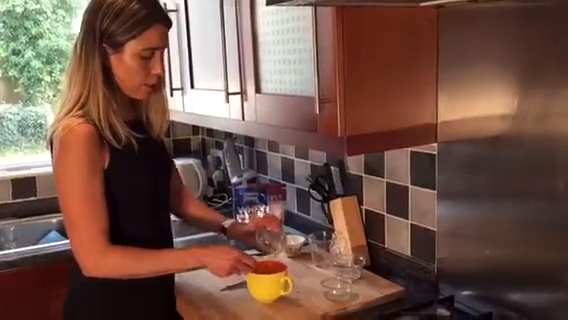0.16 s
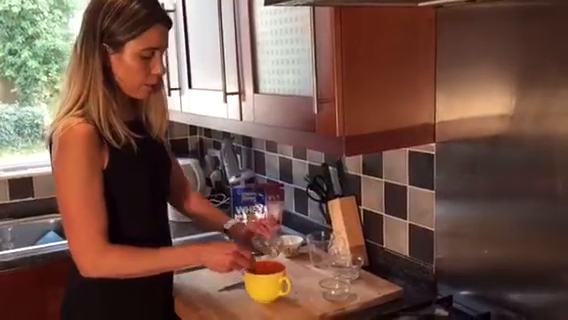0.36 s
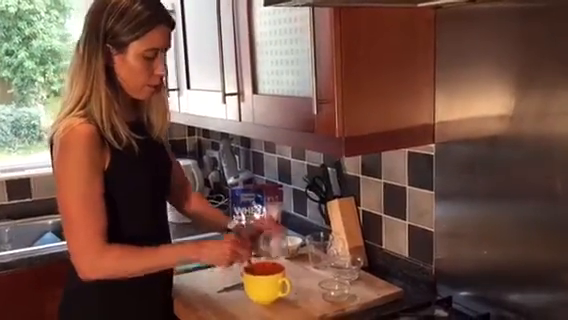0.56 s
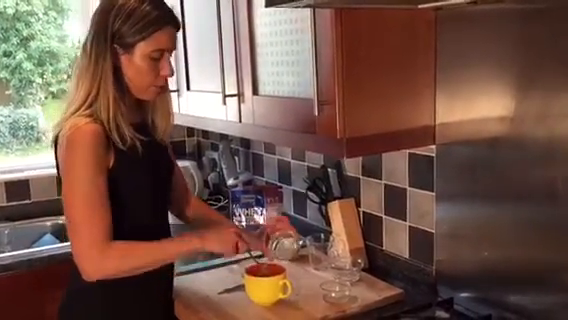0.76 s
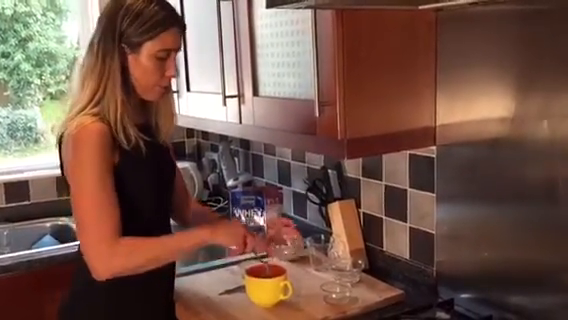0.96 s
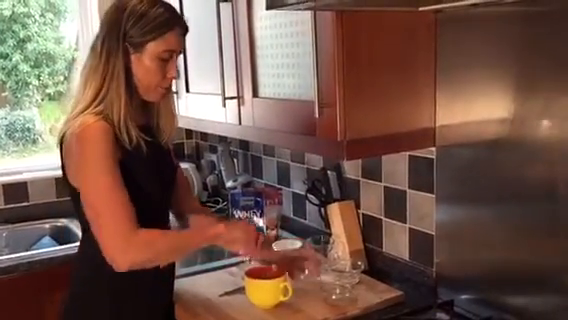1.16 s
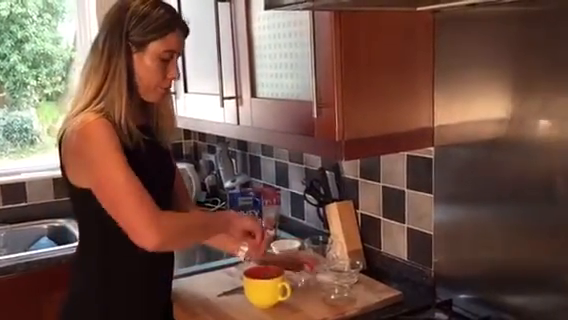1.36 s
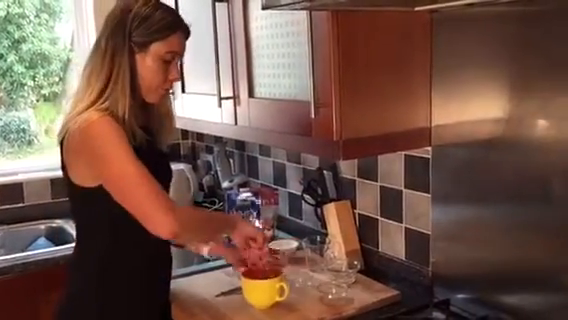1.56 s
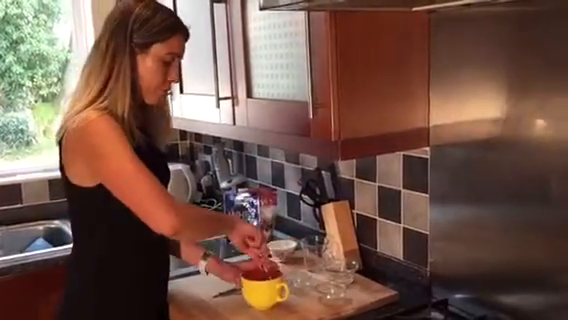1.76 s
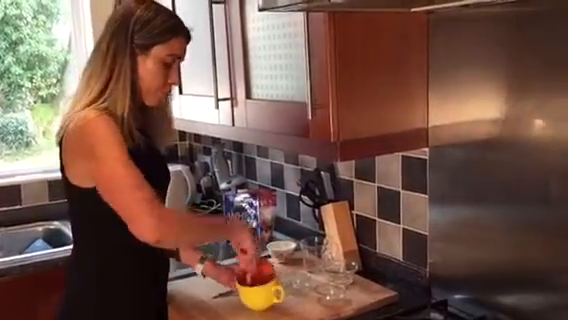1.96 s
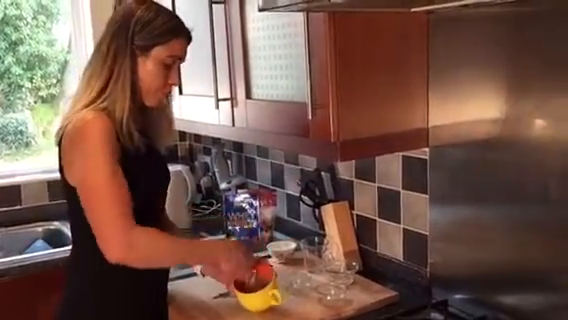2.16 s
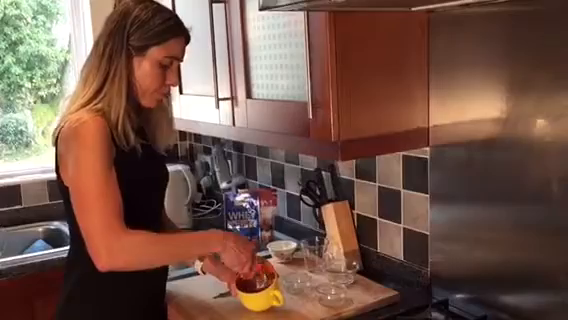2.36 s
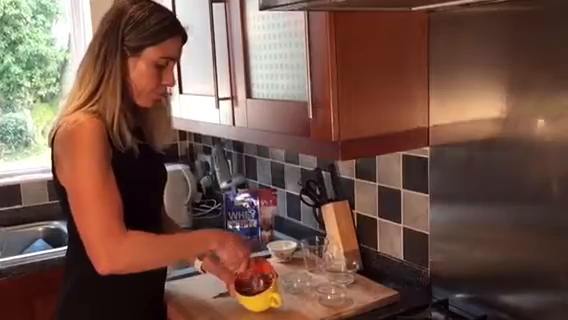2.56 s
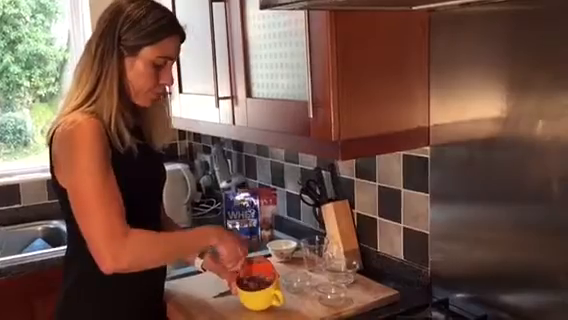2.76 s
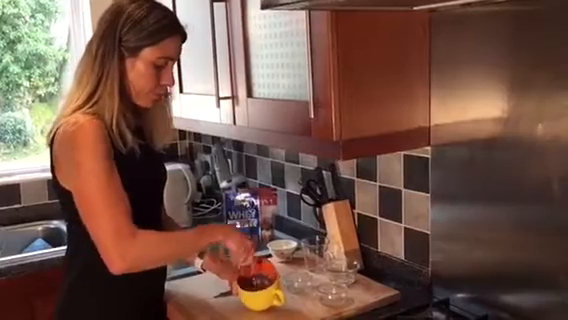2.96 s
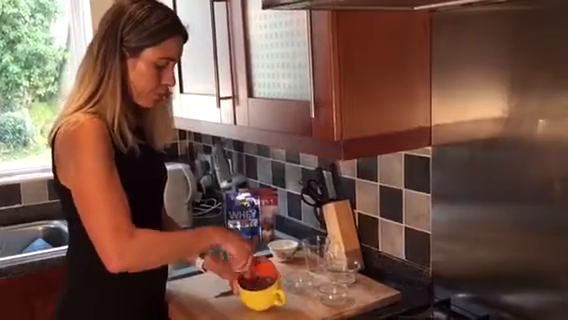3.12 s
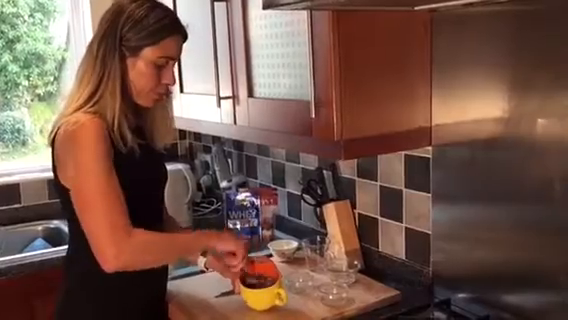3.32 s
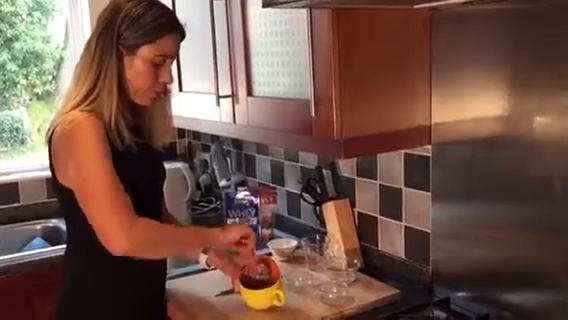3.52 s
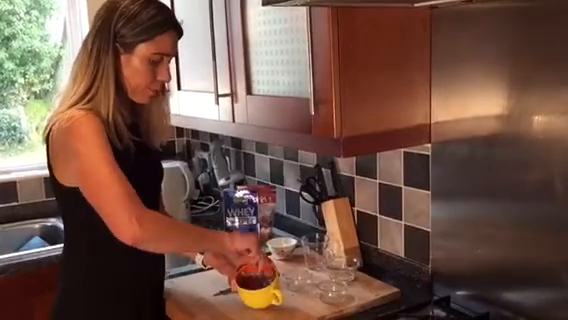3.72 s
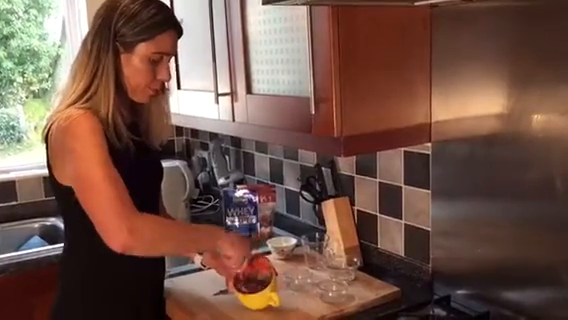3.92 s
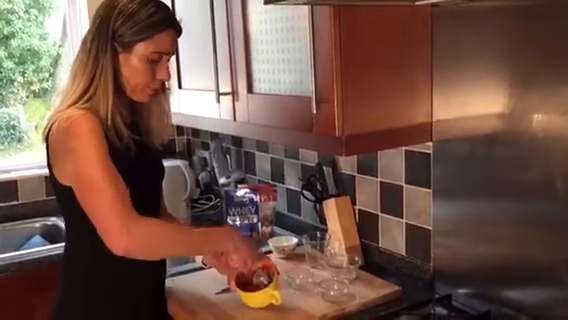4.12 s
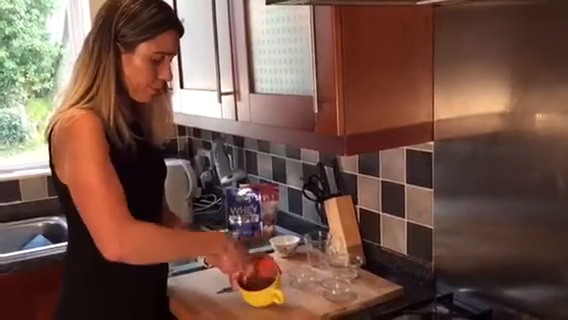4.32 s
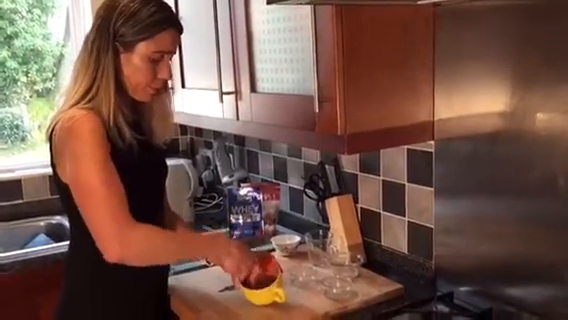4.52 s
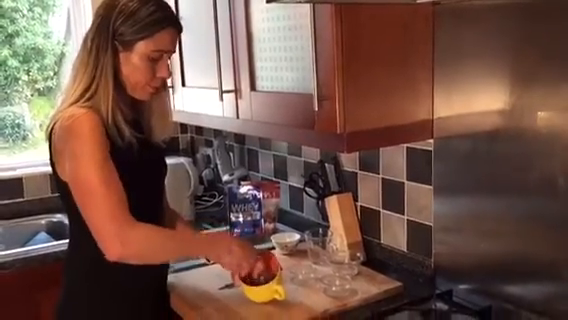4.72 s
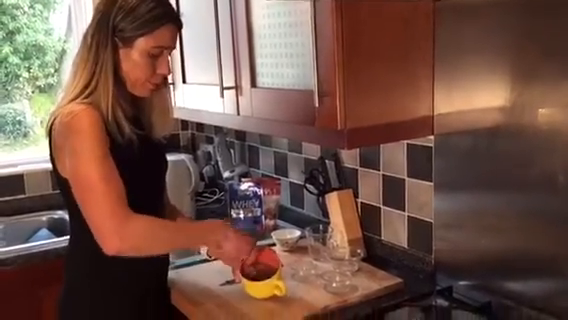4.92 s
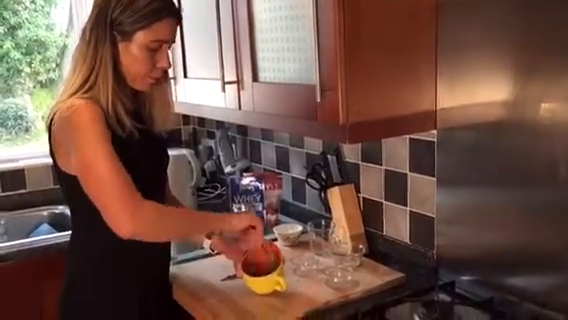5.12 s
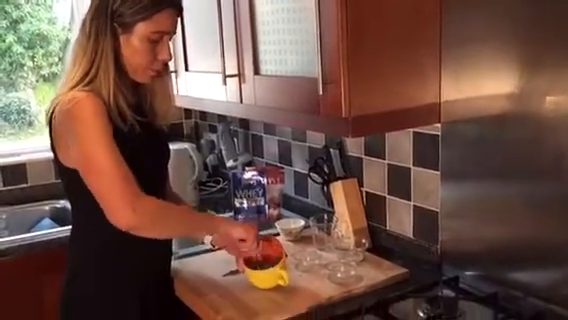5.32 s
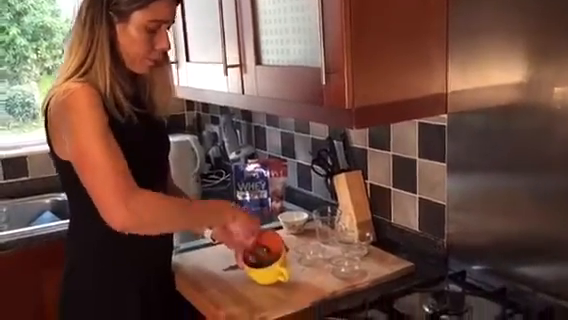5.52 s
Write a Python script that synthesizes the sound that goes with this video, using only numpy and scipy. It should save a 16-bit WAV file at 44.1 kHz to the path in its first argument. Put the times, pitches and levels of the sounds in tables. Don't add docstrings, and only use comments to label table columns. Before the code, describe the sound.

Faint touches and a fading glass ring come first, then a jar is put down firmly on a board, the loudest event. A soft mug nudge follows, then irregular spoon strokes through batter, dull slaps, ceramic clacks and light scraping, finishing with clearer ringing taps. Microphone fairly near in a small hard kitchen, with low appliance hum and short reflections.

```python
import sys
import numpy as np
from scipy import signal
from scipy.fft import irfft
from scipy.io import wavfile
from scipy.ndimage import uniform_filter1d

SR = 44100
rng = np.random.default_rng(int(sys.argv[2]) if len(sys.argv) > 2 else 0)


def convert_level_to_amplitude(level_db):
    exponent = np.asarray(level_db, float) / 20
    return 10 ** exponent


def master_out(mix):
    frames = np.transpose(np.atleast_2d(mix))
    ceiling = np.clip(frames, -1, 1)
    pcm = np.round(ceiling * 32767).astype(np.int16)
    wavfile.write(sys.argv[1], SR, pcm)


N = 250488

# start in seconds, strength in dB, sharpness of the contact in dB,
# push into the board in dB. All blow tables share these columns.
CLINKS = [
    (2.055, -60.5, 1.5, 2),
    (2.912, -34.5, -4.5, -17),
    (3.946, -44.5, -2.5, -8.5),
    (4.132, -69.5, 12.5, 2),
    (4.207, -63.5, 3, -8),
    (4.319, -57.5, -10, -1.5),
    (4.369, -30, -7.5, -16.5),
    (4.91, -66.5, 3, 0),
]
KNOCKS = [
    (0.028, -58.5, -4, -17.5),
    (3.305, -36.5, 8, -10),
    (4.588, -33, 0, -36),
    (4.825, -28.5, -3.5, -22),
]
SLAPS = [
    (1.905, -70, 27, -15),
    (1.914, -57, 12, 1.5),
    (2.129, -54, 8, -27),
    (2.552, -37.5, -5, -2),
    (2.73, -46, -12, -26.5),
    (2.775, -57.5, 6, -37),
]
GRAZES = [
    (1.657, -50.5, -1.5, -13),
    (2.491, -69, 10, -1.5),
    (2.994, -47, 4, -27),
    (3.316, -40.5, -8, -17),
    (3.42, -60, -12, -21.5),
    (4.356, -55.5, 5.5, -27),
    (4.789, -60, 1.5, -19),
]
TOUCHES = [
    (0.093, -66, 6, -19),
    (0.188, -69.5, 6.5, -20),
    (0.288, -68, 6.5, 0),
    (0.379, -77, 12, 4),
    (0.698, -76, 15, 7),
    (1.311, -73.5, 12.8, 4),
]
CRASH = [
    (3.0335, -24, 0, -4),
]
CHIMES = [
    (3.823, -53.5, -8, 0),
    (5.175, -66, 5, 1),
    (5.4615, -53, 4.5, -33),
    (5.5130, -56, 8, -25),
    (5.666, -32.5, -8.5, -27),
]
# start in seconds, hold in seconds, pressure in dB,
# height on the wall from 0 to 1, narrowness in dB a wall height away.
STROKES = [(0.068, 0.036, -65, 0.46, 27), (0.184, 0.0079, -67, .7, 31), (0.252, 0.022, -67, 0.46, 40),
           (1.858, .012, -59, 0.16, 50), (1.904, 0.015, -52, 0.97, 37), (1.947, 0.018, -52.5, 0.39, 41),
           (2.132, .025, -53, 0.51, 18), (2.54, 0.009, -60.5, 0.13, 4), (2.715, .015, -58, 0, 50),
           (2.765, 0.0049, -56.5, 0.44, 36), (2.877, 0.023, -64.5, 0.76, 19),
           (3.703, 0.038, -55.5, 0.51, 84), (3.808, 0.045, -60, 0.23, 8), (3.876, 0.058, -48, 0.78, 12.5),
           (3.994, 0.07, -56.5, 0.47, 25), (4.127, 0.03, -62, .1, -3.5), (4.574, 0.0067, -54, 0, 65),
           (4.788, .025, -54.5, 0.35, 90), (4.9, .025, -60.5, 0.54, 57), (5.18, .03, -58.5, 0, 39),
           (5.463, .02, -55.5, 0.76, 22), (5.52, .016, -52.5, 0.63, 12), (5.56, 0.034, -60.5, 0.85, 24),
           (5.625, 0.0056, -56.5, 0.3, 29)]

# frequency in Hz, level in dB, t60 in seconds.
BOWL = [(700, -2, 0.022), (950, -9, 0.0087), (1304, 14.5, 0.026)]
BOARD = [(156.8, -12, 0.022), (254.7, 11, 0.058), (331.7, 7, 0.032)]
WALL = [(1620, 10.5, 0.0067), (1885, 4, 0.01), (2204, -2, 0.019)]
RIM = [(2960, 6.5, 0.0067), (3265, 3.5, 0.016), (3760, 15, 0.0048), (3950, -40.5, 0.0032)]
SPOON = [(5490, -1, 0.011), (6680, -11, 0.018), (8170, -18.5, 0.03), (9350, -28, 0.06),
         (12200, -33.5, 0.039), (13500, -22, .03)]
MUG = [BOWL, BOARD, WALL, RIM, SPOON]
# frequency in Hz, level in dB, t60 in seconds.
BOTTOM = [
    [(559, -4.5, 0.02), (940, 14, 0.0031), (1148, -2.5, 0.024), (1335, 6, 0.0035)],
    BOARD,
    [(2123, 12, 0.013), (1670, -35, 0.012), (2274, 0.5, 0.01)],
    [(2900, -6, 0.0053), (3230, -15.5, 0.017), (3850, -11, 0.0061)],
    [(6760, 1, 0.0044), (9000, -9, 0.004)],
]
# frequency in Hz, level in dB, t60 in seconds.
FLAT = [
    [(612, 13.5, 0.0064), (1000, -10.5, 0.036), (1116, 4.5, 0.039)],
    BOARD,
    [(1820, 42, 0.0034), (2570, -22, 0.0036)],
    [(2550, -4.5, 0.058), (3340, 3.5, 0.048), (4080, 11, 0.018)],
    [(5920, 10.5, 0.0045), (7095, 1.5, 0.0055), (8580, 3, 0.0057)],
]
# frequency in Hz, level in dB, t60 in seconds.
TIPPED = [
    [(903, -4, 0.012), (1140, -0.5, 0.011)],
    BOARD,
    [(1880, 6.5, 0.022), (2125, 9, 0.011)],
    [(2624, 30.5, 0.0038), (3093, 9, 0.025), (3750, -15, 0.0068), (3927, 11, 0.0096), (4580, 24, 0.0037)],
    [(6170, -2.5, 0.003), (7030, -5, 0.004), (8320, 10.5, 0.0013)],
]
# frequency in Hz, level in dB, t60 in seconds.
BARE = [
    [(626, -10.5, 0.17), (1125, 6.5, 0.023), (1348, 5.5, 0.051)],
    BOARD,
    [(2130, 0, 0.011)],
    [(3134, 3, 0.036), (3506, -11, 0.054)],
    [(5590, 3.5, 0.05), (6720, 0, 0.089), (8100, -6, 0.055), (9500, -4.5, 0.066), (12980, -17, 0.043)],
]
# low edge in Hz, high edge in Hz.
PART_EDGES_HZ = [(450, 1500), (120, 450), (1500, 2600), (2600, 4700), (4700, 13500)]
SHARPNESS_SHARE = (0.37, .8, 1.34)
HEIGHTS = (0, .33, .67, 1)

# start in seconds, level in dB.
NUDGES = [
    (1.805, -58.5),
    (1.823, -45),
    (1.87, -58),
    (1.919, -89),
]
# start in seconds, level in dB.
SWELLS = [
    (1.409, -59),
    (1.471, -66.5),
    (2.579, -71),
    (3.045, -58),
    (3.339, -68.5),
    (3.861, -72),
    (3.982, -70),
]
LANDINGS = [
    (1.359, -29.5, -28, -7),
    (1.422, -11.5, 1.5, -46),
]
# frequency in Hz, level in dB, t60 in seconds.
FOOT = [
    [(558, -13.5, 0.029), (735, -10.5, 0.0098), (942, -5.5, 0.0081), (1187, -7, 0.012)],
    [(250, -4.5, 0.02), (380, -8, 0.03)],
    [(1544, 8, 0.0077), (1930, 4, 0.014), (2390, 3.5, 0.0088)],
    [(2750, -0.6, .008), (3275, -0.5, 0.013), (3760, -1, 0.0069), (3890, -14, 0.0099)],
    [(6700, 2.5, .003), (9000, -0.5, 0.002)],
]
# low edge in Hz, high edge in Hz.
FOOT_EDGES_HZ = [(450, 1500), (120, 450), (1500, 2600), (2600, 3900), (5000, 13500)]
GLASS_HZ = (2372, 2391, 9647, 9560, 13370)
# level in dB, t60 in seconds.
GLASS_DECAY = [(-21.5, .6), (-21.5, .4), (-46, .15), (-52, .1), (-54, .15)]

# frequency in Hz, t60 in seconds.
KITCHEN = [(100, 0.35), (400, 0.35), (1040, 0.43), (2760, 0.38), (7280, 0.36), (14000, 0.23)]
# frequency in Hz, width in Hz, level in dB.
HUM = [(48.5, 1.7, -76.5), (157.7, 8, -77.5), (318, 42, -84), (375, 16, -79.5)]
# frequency in Hz, level in dB per Hz.
AIR = [(25, -40.5), (40, 1), (60, -1.5), (100, -14.5), (200, -9), (400, -10), (700, -12.5), (1500, -19),
       (3000, -20), (8000, -25.5), (15100, -28)]

BLOW = 6000


def spoon():
    clinks = knocks(CLINKS, MUG, crack_db=-4.5, bounce_s=0.0046, rise_s=0.00053,
                    trims_db=(-10.0, -7.0, -12, -6, -8.5))
    deep = knocks(KNOCKS, BOTTOM, crack_db=-6, bounce_s=0.00265, rise_s=0.00057,
                  trims_db=(-10.0, 2.5, -15.5, -22.5, -38), shares=(1.3, .8, .3))
    slaps = knocks(SLAPS + GRAZES + TOUCHES, FLAT, crack_db=-4.5, bounce_s=0.00313, rise_s=0.00012,
                   trims_db=(-8, -7.5, -10.5, -21.0, -17.0))
    crash = knocks(CRASH, TIPPED, crack_db=-4.0, bounce_s=0.001, rise_s=0.0013,
                   trims_db=(-4.5, -7.5, -11.0, -3.5, -15))
    chimes = knocks(CHIMES, BARE, crack_db=-13.5, bounce_s=0.0042, rise_s=0.001,
                    trims_db=(-1, -7, -17, -4, -11))
    return clinks + deep + slaps + crash + chimes


def knocks(events, body, crack_db, bounce_s, rise_s, trims_db, bands=PART_EDGES_HZ, shares=SHARPNESS_SHARE):
    out = np.zeros(N)
    luck = rng.standard_normal((len(events), 5, 12))
    chatters = rough_contact(len(events))
    for (s, strength_db, sharp_db, push_db), chance, chatter in zip(events, luck, chatters):
        levels_db = strength_db + np.r_[0, push_db, sharp_db * np.array(shares)]
        click = contact(bounce_s * np.exp(0.53 * chance[0, -1]), sweep_s=0.001798)
        touches = [click, click, click + chatter, click + 2 * chatter, chatter]
        for modes, db, trim_db, edges, c, touch in zip(body, levels_db, trims_db, bands, chance, touches):
            tones = ring(modes, c, rise_s)
            crack = band(touch, edges)
            sound = tones / np.linalg.norm(tones[:400]) + convert_level_to_amplitude(crack_db) * crack / np.linalg.norm(crack)
            add(out, s, convert_level_to_amplitude(db + trim_db) * 20 * sound)
    return out


def ring(modes, luck, rise_s):
    hz, db, t60 = np.transpose(modes)[:, :, None]
    t = np.arange(BLOW) / SR
    luck = luck[:2 * len(modes)].reshape(2, -1, 1)
    db = db + 1.5 * luck[0]
    hz = hz * (1 + .008 * luck[1])
    sides = (-1.) ** np.arange(len(modes))[:, None]
    tones = sides * convert_level_to_amplitude(db - 60 * t / t60) * np.sin(2 * np.pi * hz * t)
    return tones.sum(0) * (1 - np.exp(-t / rise_s)) ** 2


def contact(bounce_s, sweep_s):
    hz = np.fft.rfftfreq(BLOW, 1 / SR)
    sweep = np.exp(-2j * np.pi * sweep_s * hz * (1 - hz / SR))
    bounce = .25 * np.exp(-2j * np.pi * bounce_s * hz)
    return irfft(sweep * (1 - bounce), BLOW)


def rough_contact(count):
    scatter_s = .004
    wander = uniform_filter1d(rng.standard_normal((count, BLOW)), size=30, axis=1)
    lag_s = scatter_s * abs(evened(wander[:, :BLOW // 2 + 1]))
    phase = 2 * np.pi * np.cumsum(lag_s, axis=1) * SR / BLOW
    return irfft(np.exp(-1j * phase), axis=1) * (np.arange(BLOW) < BLOW // 2)


def scrape(per_s=2500, spread_db=0.0, hiss_db=(-1.5, -1.5, 1.5, 4), trims_db=(-6, -6, -6, -6)):
    bite_db_per_s, lift_db_per_s = 900, 217.5
    sizes = convert_level_to_amplitude(spread_db * np.minimum(rng.exponential(1, N), 4))
    slips = sizes * (rng.random(N) < per_s / SR) * rng.choice([-1, 1], N)
    start, hold, db, height, focus_db = np.transpose(STROKES)[:, :, None]
    t = np.arange(0, N / SR + .01, .002)
    bite_db = bite_db_per_s * np.maximum(start - t, 0)
    lift_db = lift_db_per_s * np.maximum(t - start - hold, 0)
    pressure_db = db - bite_db - lift_db
    out = np.zeros(N)
    for k, part in enumerate([0, 2, 3, 4]):
        tones = evened(signal.oaconvolve(slips, ring(MUG[part], np.zeros(12), rise_s=0.00006))[:N])
        hiss = evened(band(slips, PART_EDGES_HZ[part]))
        layer = evened(tones + convert_level_to_amplitude(hiss_db[k]) * hiss)
        reach_db = focus_db * (height - HEIGHTS[k]) ** 2
        level = convert_level_to_amplitude(pressure_db + trims_db[k] - reach_db).max(axis=0)
        out += np.interp(np.arange(N) / SR, t, level) * layer
    return out


def nudges():
    out = np.zeros(N)
    thud = [(228, 0, 0.083), (480, 7.0, 0.0091), (114, -25.0, 0.12)]  # Hz, dB, t60 s
    boom = [(61.7, 0.016, 0.084)]
    for s, db in NUDGES:
        add(out, s, convert_level_to_amplitude(db + 10.5) * ring(thud, np.zeros(6), rise_s=0.0014))
    for s, db in SWELLS:
        add(out, s, convert_level_to_amplitude(db + 26.5) * ring(boom, np.zeros(2), rise_s=0.0095))
    return out


def jar():
    return knocks(LANDINGS, FOOT, crack_db=-3.5, bounce_s=0.0025, rise_s=0.00023,
                  trims_db=(-8.5, -14, -12.5, -26.0, -46.5), bands=FOOT_EDGES_HZ)


def glass():
    out, tones = np.zeros(N), np.zeros(SR)
    t = np.arange(SR) / SR
    for k, (hz, (db, t60)) in enumerate(zip(GLASS_HZ, GLASS_DECAY)):
        tones += (-1) ** k * convert_level_to_amplitude(db - 60 * t / t60) * np.sin(2 * np.pi * hz * t)
    add(out, LANDINGS[1][0], convert_level_to_amplitude(1.6) * tones * (1 - np.exp(-t / 0.025)))
    add(out, 0, convert_level_to_amplitude(-44.5) * tones[1500:])
    return out


def kitchen(x, gap=90):
    taps = np.zeros(SR)
    at = np.arange(100, SR - 20, 20)
    taps[at + rng.integers(0, 20, len(at))] = rng.choice([-1., 1.], len(at))
    taps *= 1 - np.exp(-np.arange(SR) / gap)
    hz, t, z = signal.stft(taps, SR, nperseg=256)
    fade = convert_level_to_amplitude(-60 * t / read(KITCHEN, hz)[:, None])
    z = z * fade
    z *= (np.linalg.norm(fade, axis=1) / np.linalg.norm(z, axis=1))[:, None]
    tail = signal.istft(z, SR, nperseg=256)[1]
    tail[:100] = 0
    return signal.fftconvolve(x, tail / np.linalg.norm(tail))[:N]


def air():
    frames, hz = N // 256 + 5, np.fft.rfftfreq(1024, 1 / SR)
    a, b, patches = rng.standard_normal((frames, 513, 3)).T
    patches = evened(uniform_filter1d(uniform_filter1d(patches, 12, 0), 14, 1))
    colour = convert_level_to_amplitude(read(AIR, hz)[:, None] + 1.2 * patches)
    hiss = signal.istft((a + 1j * b) * colour, nperseg=1024, noverlap=768)[1]
    return convert_level_to_amplitude(-69) * evened(hiss[:N])


def appliance():
    return sum(convert_level_to_amplitude(db) * whistle(hz, width) for hz, width, db in HUM)


def pipe():
    late = np.maximum(np.arange(N) / SR - 1.03, 0)
    level = np.clip(late / .03, 0, 1) * convert_level_to_amplitude(-73 - 40 * late)
    return level * whistle(760, width=11)


def whistle(hz, width):
    r = np.exp(-np.pi * width / SR)
    noise = rng.standard_normal(N) + 1j * rng.standard_normal(N)
    slow = signal.lfilter([1 - r], [1, -r], noise)
    return evened((slow * np.exp(2j * np.pi * hz * np.arange(N) / SR)).real)


def evened(x):
    return x / np.sqrt(np.mean(x ** 2) + 1e-20)


def read(points, hz):
    f, value = np.transpose(points)
    return np.interp(np.log(hz + 1), np.log(f + 1), value)


def add(mix, s, sound):
    part = mix[round(s * SR):][:len(sound)]
    part += sound[:len(part)]


def band(x, edges_hz):
    return signal.sosfilt(signal.butter(3, edges_hz, "bandpass", fs=SR, output="sos"), x)


def scene():
    blows, strokes, thuds, landing, ringing = spoon(), scrape(), nudges(), jar(), glass()
    sends = convert_level_to_amplitude(1) * blows + convert_level_to_amplitude(-9) * strokes + convert_level_to_amplitude(-2.5) * thuds
    sends += convert_level_to_amplitude(4.0) * band(landing, (60, 4300)) + convert_level_to_amplitude(-19.5) * ringing
    near = blows + strokes + thuds + landing + ringing
    return (near + kitchen(sends) + air() + appliance() + pipe())[None]


def band_limit(x):
    return signal.sosfilt(signal.butter(12, 15270, fs=SR, output="sos"), x)


def record(dry):
    power_db = 10 * np.log10(abs(uniform_filter1d(dry[0] ** 2, 300)) + 1e-12)
    fall = np.arange(N) * 75.0 / SR
    held_db = np.maximum.accumulate(power_db + fall) - fall
    over_db = np.maximum(held_db + 32, 0)
    ducked = dry / convert_level_to_amplitude(0.22 * uniform_filter1d(over_db, 200))
    thinned = signal.sosfilt(signal.butter(4, 42, "highpass", fs=SR, output="sos"), ducked)
    treble_cut = signal.firwin(255, 15300, window=("kaiser", 8), fs=SR)
    finished = signal.oaconvolve(thinned, treble_cut[None], "same")
    return band_limit(finished)


dry = scene()
out = record(dry)
master_out(out)
```